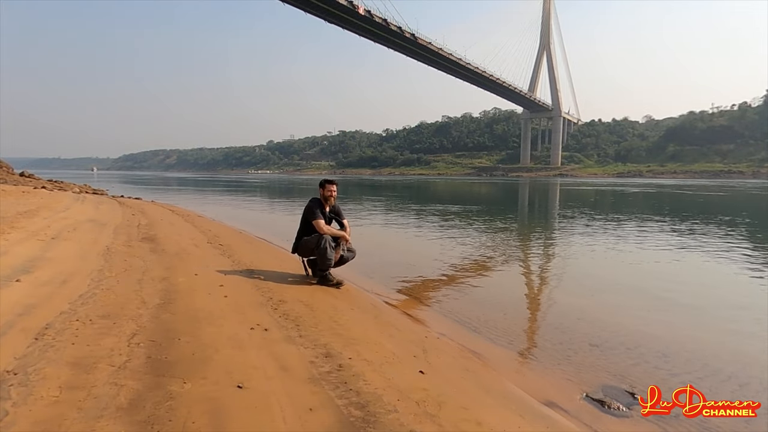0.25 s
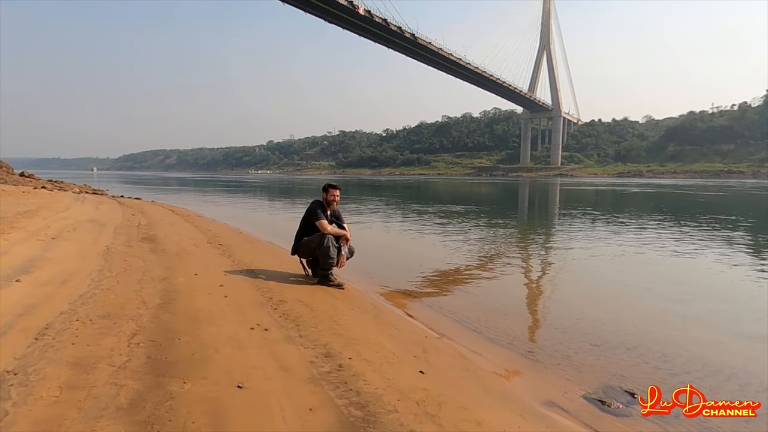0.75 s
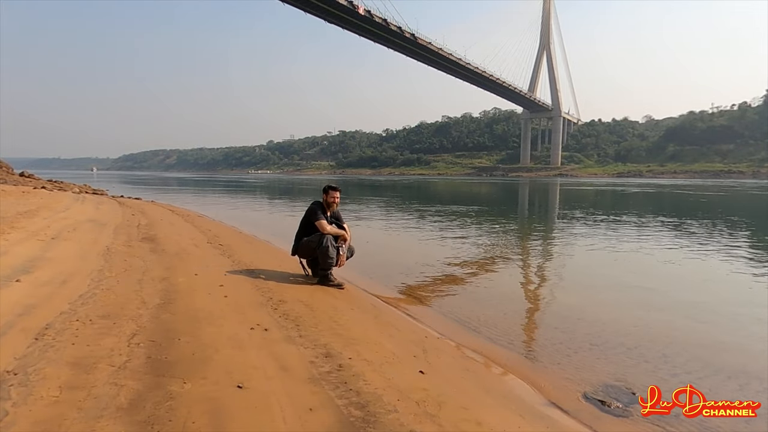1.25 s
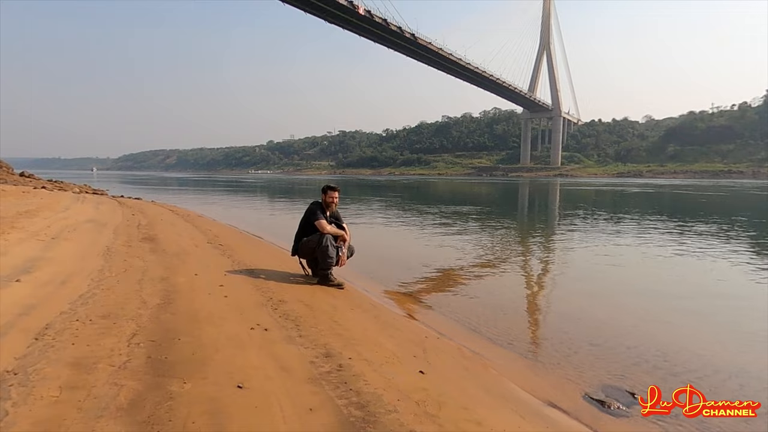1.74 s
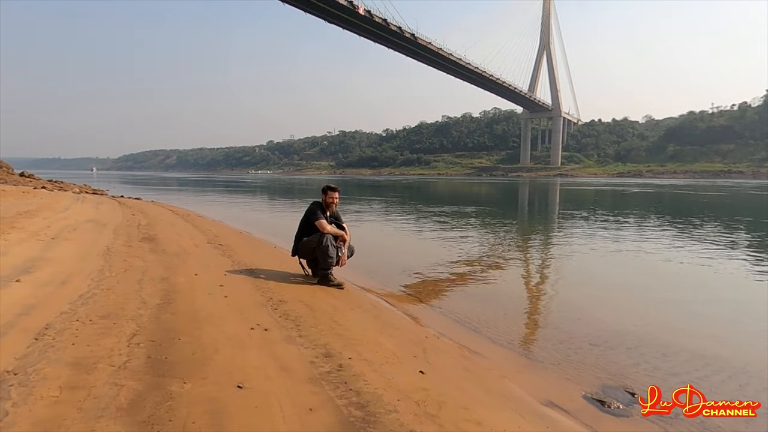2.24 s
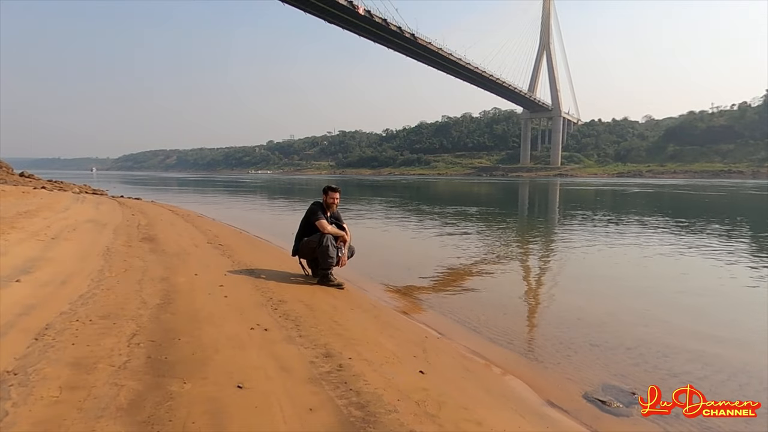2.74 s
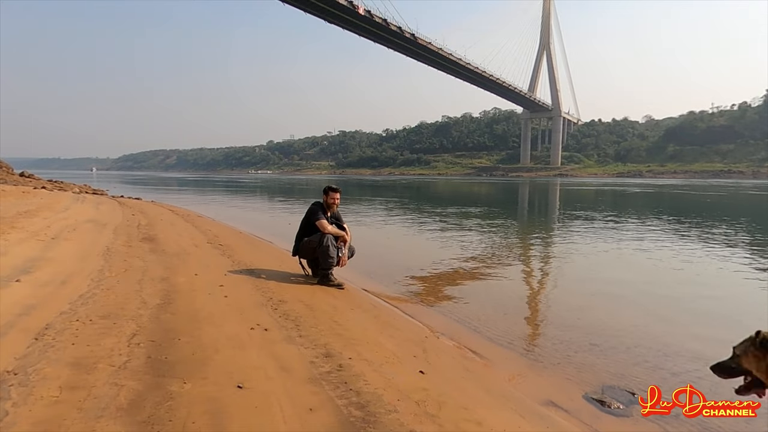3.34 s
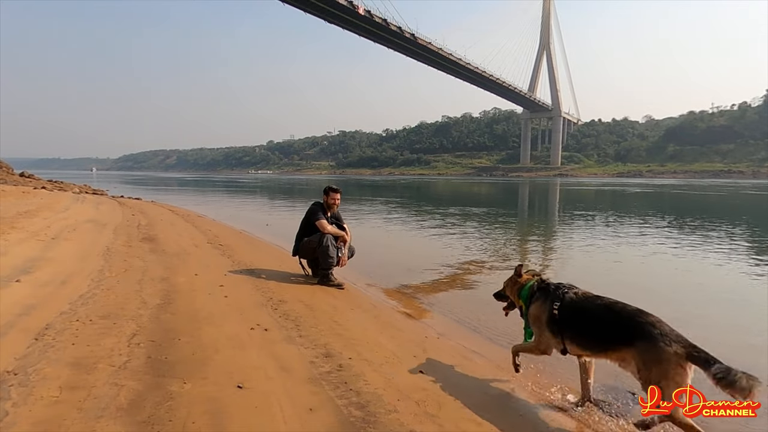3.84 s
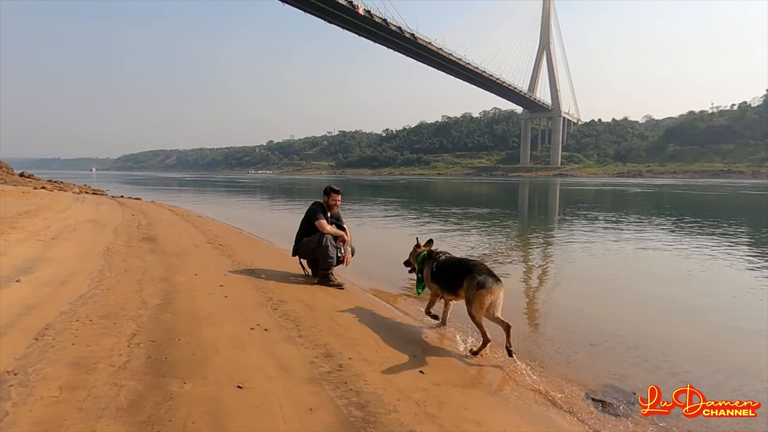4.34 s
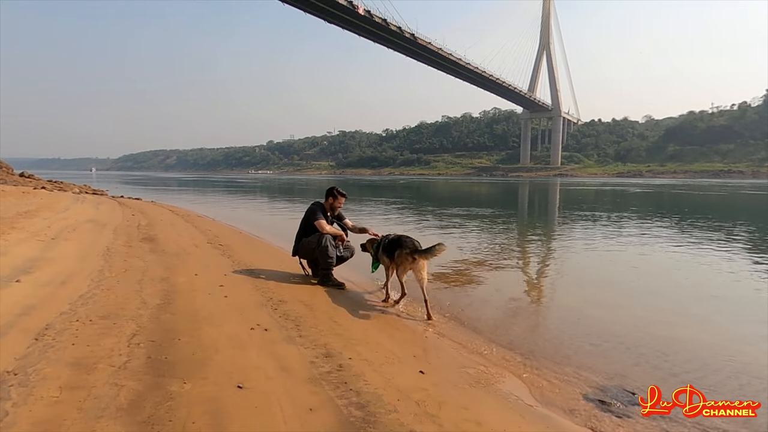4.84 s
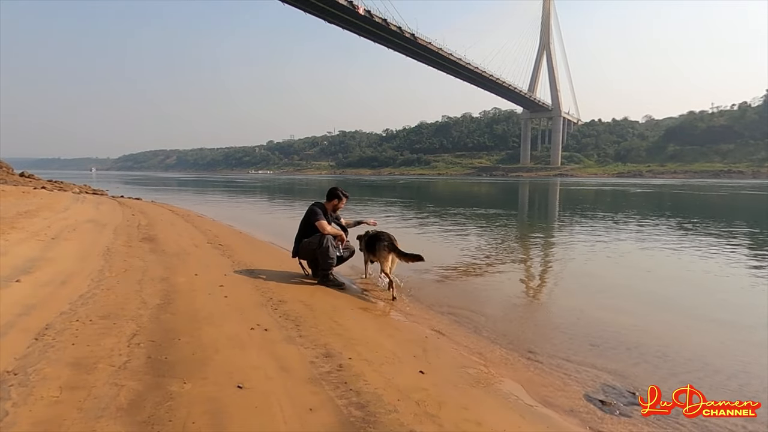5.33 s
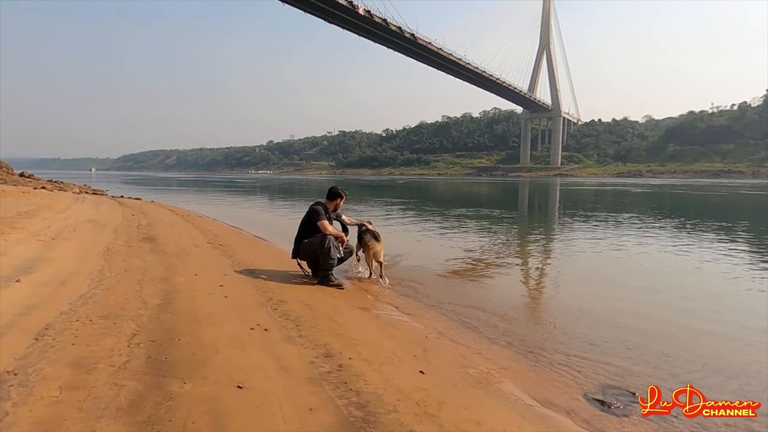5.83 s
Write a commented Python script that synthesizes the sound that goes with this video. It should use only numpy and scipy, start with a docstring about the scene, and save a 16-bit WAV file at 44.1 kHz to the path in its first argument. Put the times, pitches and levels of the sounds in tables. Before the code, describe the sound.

A dog trots through river shallows from the right to ahead, paws splashing, plopping and slapping over a faint distant engine drone and low rumble.

```python
"""A dog trots through the shallows along a sandy river shore, coming in from the right and moving ahead.
Its paws slap the water and trap air pockets: gliding sines with bubble clouds, noise froth and gulps,
short knocks and snaps. Its strokes stir sloshing, pattering water made of clicks, noise and tiny bubbles.
Far off a slow diesel engine, probably a boat's, drones as a stack of wandering sines over a distant noise
rumble, and a light breeze adds low flutter."""
import sys
import numpy as np
from scipy import signal
from scipy.fft import rfft, irfft, next_fast_len
from scipy.io import wavfile
from scipy.ndimage import uniform_filter1d

SR = 44100
rng = np.random.default_rng(int(sys.argv[2]) if len(sys.argv) > 2 else 0)


def store_pcm(level_fs):
    """Save levels as 16-bit WAV."""
    pcm = np.round(np.clip(level_fs, -1, 1) * 32767).astype(np.int16)
    wavfile.write(sys.argv[1], SR, np.atleast_2d(pcm).T)


N = 268128
TIME = np.arange(N) / SR

# paws plunge: (time [s], level [dB], nominal pitch of the air pocket [Hz], nominal decay of its cloud [s])
PAW_PLUNGES = [(0.07, -29, 846, 0.01), (0.127, -27, 1660, 0.026), (0.462, -24.5, 510, 0.027),
               (0.509, -24, 700, 0.023), (0.698, -31.5, 616, 0.01), (0.826, -21.5, 447, 0.017),
               (0.831, -24, 1300, 0.0061), (0.856, -27, 415, 0.022), (0.878, -21.5, 675, 0.021),
               (1.194, -24, 684, 0.017), (1.222, -20.5, 990, 0.012), (1.238, -22.5, 530, 0.014),
               (1.264, -24, 584, 0.0081), (1.29, -31, 1050, 0.0093), (1.445, -34, 535, 0.02),
               (1.633, -23, 485, 0.034), (1.905, -28, 835, 0.014), (1.947, -23, 694, 0.013),
               (2.261, -23.5, 775, 0.013), (2.531, -21, 1220, 0.013), (2.578, -28, 860, 0.014),
               (2.598, -18.5, 830, 0.016), (2.624, -17.5, 1140, 0.014), (2.928, -21.5, 660, 0.03),
               (2.948, -18, 907, 0.0092), (3.117, -22, 720, 0.02), (3.147, -17.5, 1510, 0.019),
               (3.438, -16, 1910, 0.013), (3.449, -21.5, 870, .014), (3.711, -15.5, 3450, 0.0066),
               (3.72, -27, 1870, 0.016), (3.732, -20.5, 2100, 0.015), (3.848, -20, 905, 0.0063),
               (3.895, -21, 1740, 0.013), (3.987, -18, 2230, 0.0072), (4.008, -20, 1700, 0.012),
               (4.017, -13.5, 1310, 0.018), (4.289, -21, 2120, 0.024), (4.31, -21.5, 1910, 0.022),
               (4.611, -22, 1700, 0.012), (4.624, -17, 1980, 0.011), (4.64, -17.5, 1170, 0.0095),
               (4.968, -27, 663, 0.0069), (5, -31, 1141, .014), (5.368, -22.5, 976, 0.017),
               (5.398, -27, 1020, 0.016), (5.422, -32, 1210, 0.0089), (5.696, -29, 1910, 0.012),
               (5.767, -25, 1060, 0.019), (5.814, -20.5, 790, 0.017), (5.84, -26, 1090, 0.0084),
               (5.921, -22, 1860, 0.0094), (6.035, -21.5, 1820, 0.019)]


def plunges():
    """A paw traps one big air pocket, which breaks into a cloud of bubbles: dense at once, then thinning and fading."""
    pocket_db, cloud_db, tail_db = 0.1, -6.0, -7.0  # the tail falls per cloud time
    cycles, rise, octaves, count = 13, 0.47, 0.417, 24
    out = np.zeros(N)
    for s, db, hz, cloud_s in PAW_PLUNGES:
        add(out, s, from_db(db + pocket_db) * bubble(hz * 0.948, cycles, rise))
        for turn, pitch, life in zip(rng.random(count), rng.standard_normal(count), rng.random(count)):
            late = 3.5 * turn ** 1.4  # in cloud times, crowded towards the start
            pitch = np.clip(pitch, -1.5, 2.5)
            gain_db = db + cloud_db + tail_db * late - 1.5 * abs(pitch)
            gain = from_db(gain_db) * rng.choice([-1, 1])
            small_bubble = bubble(hz * 2 ** (octaves * pitch), cycles * (.5 + life), rise)
            add(out, s + late * cloud_s, gain * small_bubble)
    return out


def froth():
    """Countless tiny pockets tear off each plunge: they gather as the paw enters, then trail off raggedly."""
    level_db, octaves_below, octaves_above = -16.5, 0.45, 0.71  # noise band around the big pocket's pitch
    attack_s, lasts = 0.0035, 0.95  # decay in cloud times
    lead_db, lead_s, ragged_db = -14, 0.046, 1.5
    out, age = np.zeros(N), np.arange(-SR // 20, SR // 6) / SR
    after = np.maximum(age, 0)
    entry = from_db(lead_db) * np.exp(-abs(age) / lead_s)
    tatters = from_db(ragged_db * drift(83))
    for s, db, hz, cloud_s in PAW_PLUNGES:
        band = [hz / 2 ** octaves_below, hz * 2 ** octaves_above]
        grains = rms_one(cut(rng.standard_normal(len(age)), band, "band"))
        tail = (1 - np.exp(-after / attack_s)) * np.exp(-after / (lasts * abs(cloud_s)))
        add(out, s + age[0], from_db(db + level_db) * grains * (tail + entry))
    return out * rms_one(tatters)


def gulps():
    """The hollow behind a deep plunge fills with a low lumpy gulp; small high pockets have hardly any."""
    level_db, low_hz, high_hz, deep_hz = -14.0, 300, 720, 650
    attack_s, lasts = 0.0029, 0.92  # decay in cloud times
    out, age = np.zeros(N), np.arange(SR // 6) / SR
    for s, db, hz, cloud_s in PAW_PLUNGES:
        depth = 1 / (1 + (hz / deep_hz) ** 4)
        body = rms_one(cut(rng.standard_normal(len(age)), [low_hz, high_hz], "band"))
        envelope = (1 - np.exp(-age / attack_s)) * np.exp(-(age / (lasts * cloud_s)) ** 2)
        add(out, s, depth * from_db(db + level_db) * body * envelope)
    return out


def pops():
    """Cavities under the paws clap shut with a short hollow knock."""
    # cavity closures: (time [s], level [dB], pitch [Hz], ringing [cycles])
    closures = [(0.5100, -27.5, 980, 1.2), (1.1953, -30, 740, 2), (1.2231, -27, 950, 1.4),
                (1.9475, -26.5, 1100, 1.3), (2.1602, -26, 1590, 1.4), (2.5319, -29, 1180, 1.6),
                (2.6202, -17, 960, 3.1), (2.624, -18, 1280, 2.2), (2.9485, -23.5, 964, 6),
                (3.4381, -21, 1910, 3.2), (3.722, -18.5, 1800, 2.6), (3.7316, -17.5, 2590, 8.1),
                (3.8478, -22, 1050, 1.8), (3.9932, -14, 3480, 2.7), (4.0087, -15.5, 1880, 1.8),
                (4.6152, -18.5, 1450, 2), (4.6363, -15, 1500, 3.7), (4.9670, -22, 835, 1.3),
                (5.3675, -26, 1000, 4.8), (5.4234, -24, 1480, 2.2), (5.7765, -34.5, 1360, 1.6)]
    out = np.zeros(N)
    for s, db, hz, cycles in closures:
        add(out, s, from_db(db) * pop(hz, cycles))
    return out


def slaps():
    """Water hit flat: one snap, then a brief faint spatter of decaying noise."""
    # sharp slaps: (time [s], level [dB], centre [Hz])
    flat_hits = [(0.0736, -27, 2330), (0.3997, -19.5, 4100), (0.7030, -35, 3200), (0.8345, -22.5, 2760),
                 (0.8682, -24, 5000), (1.8586, -23, 4650), (2.032, -21, 5370), (2.1287, -22, 5200),
                 (2.1352, -21, 5200), (2.1858, -32, 3640), (2.1924, -30, 4410), (2.2725, -10.5, 3520),
                 (2.3141, -29, 3970), (2.4989, -16, 3820), (2.535, -27, 2800), (2.6233, -30, 4500),
                 (3.0485, -18, 4420), (3.0976, -18, 4600), (3.1250, -19, 1970), (3.392, -14, 3900),
                 (3.3926, -19, 4100), (3.4688, -20, 4000), (3.479, -17, 4670), (3.6168, -19, 3320),
                 (3.7133, -18, 3160), (3.897, -20.5, 2040), (3.9065, -26, 2210), (3.9894, -19, 3000),
                 (4.0077, -16, 3000), (4.1083, -27, 3700), (4.2924, -23, 3040), (4.3119, -23, 2430),
                 (4.416, -26.5, 4800), (4.568, -25, 2970), (5.1935, -24, 5230), (5.2418, -24.5, 3620),
                 (5.2768, -26.5, 2600), (5.4162, -26, 1910), (5.4202, -23.5, 2350), (6.037, -22, 2500)]
    snap_cycles, spatter_db, spatter_band_hz, decay_s = 1.22, -15, [1900, 7500], 0.0024
    out, age = np.zeros(N), np.arange(SR // 20) / SR
    for s, db, hz in flat_hits:
        noise = rms_one(cut(rng.standard_normal(len(age)), spatter_band_hz, "band"))
        spatter = noise * np.exp(-age / decay_s)
        add(out, s, from_db(db) * pop(hz, snap_cycles))
        add(out, s, from_db(db + spatter_db) * spatter)
    return out


def pop(hz, cycles):
    """A cavity closes: it starts within a fraction of a cycle, rings briefly and is cut short; height 1."""
    turn = np.arange(int(3 * abs(cycles) / hz * SR) + 4) * hz / SR
    wave = np.sin(2 * np.pi * turn) * (1 - np.exp(-10 * turn)) * np.exp(-(turn / cycles) ** 3)
    return wave / np.abs(wave).max()


def bubble(hz, cycles, rise, swell_cycles=0.93):
    """A trapped bubble swells within a cycle or so, rings on, and climbs in pitch as it nears the surface."""
    age = np.linspace(0, 1, int(cycles / hz * SR) + 2)  # share of its life
    swell = 1 - np.exp(-cycles * age / swell_cycles)
    ring = np.sin(2 * np.pi * cycles * (age + rise * age ** 2 / 2))
    return swell * ring * np.exp(-np.log(1000) * age)  # the decay reaches -60 dB


def stirring():
    """Levels of gurgle, slosh and spray: strokes add power to churning water; the gurgle trails the slosh."""
    # a leg sweeps through the water:
    # (start [s], time to build [s], time at full strength [s], spray level [dB], slosh level [dB])
    strokes = [(0.064, 0.0061, 0.0077, -38, -55.5), (0.295, 0.025, 0.015, -38, -64),
               (0.385, 0.0087, 0.086, -45.5, -54), (0.635, 0.004, 0.0053, -42, -68),
               (0.679, 0.015, 0.049, -39.5, -54), (0.81, 0.0048, 0.05, -43, -51),
               (1.069, 0.0077, 0.11, -42.5, -55), (1.381, 0.014, 0.011, -40.5, -55),
               (1.445, 0.026, 0.082, -40, -52.5), (1.71, 0.13, 0.048, -37, -50.5),
               (1.91, 0.022, 0.031, -43, -59), (2.124, 0.0025, 0.006, -38, -53),
               (2.163, 0.018, 0.0074, -33, -43), (2.251, 0.008, 0.006, -33.5, -40.5),
               (2.441, 0.022, 0.07, -38.5, -51), (2.61, 0.0055, 0.012, -35.5, -57),
               (2.76, 0.034, 0.066, -36.5, -45), (3.0, 0.11, 0.025, -34, -43),
               (3.234, 0.056, 0.048, -43, -45), (3.374, 0.017, 0.03, -33, -40.5),
               (3.613, 0.026, 0.051, -40.5, -42.5), (3.698, 0.0044, 0.023, -37.5, -34),
               (3.877, 0.019, 0.025, -41, -43.5), (3.977, 0.0056, 0.011, -36.5, -33.5),
               (4.186, 0.036, 0.1, -42, -65), (4.558, 0.014, 0.049, -41.5, -46),
               (4.755, 0.097, 0.073, -42, -48.5), (4.929, 0.0048, 0.074, -51, -44),
               (5.168, 0.071, 0.037, -45, -46.5), (5.359, 0.0037, 0.051, -49.5, -53),
               (5.54, 0.025, 0.15, -48.5, -46), (5.806, 0.0044, 0.018, -42.5, -41.5),
               (5.89, 0.17, 0.029, -45.5, -56)]
    # spray of the water that churns on between strokes: (time [s], level [dB])
    churn = [(0.0, -55), (0.6, -49), (0.9, -49), (1.7, -46), (2.38, -55), (2.7, -44.5), (2.85, -44),
             (3.5, -44.5), (3.83, -52.5), (4.1, -51.5), (4.39, -63), (4.5, -48.5), (4.71, -65), (5.08, -58),
             (5.52, -54.5), (6.08, -52.5)]
    # slosh of middling bubbles between strokes: (time [s], level [dB])
    slosh_between = [(0.0, -63), (1.2, -55), (2.0, -58.5), (2.38, -61.5), (3.0, -49), (3.8, -50.5),
                     (4.5, -55.5), (5.1, -59.5), (5.4, -42.5), (5.53, -58), (5.7, -44), (6.08, -51)]
    # gurgle of large bubbles: (time [s], level [dB])
    gurgle = [(0.0, -62), (0.3, -53), (0.8, -50), (1.7, -43), (2.2, -46), (3.0, -43), (3.7, -47.5),
              (4.25, -50), (4.65, -54.5), (4.84, -44.5), (5.15, -53), (5.55, -51.5), (6.08, -44.5)]
    spray_fall, slosh_fall = 285, 269  # dB per s
    follows, lag_s = 0.52, 0.0086  # share of the slosh's swing that the gurgle takes, and how much later
    spray_power = from_db(in_time(churn)) ** 2
    slosh_power = from_db(in_time(slosh_between)) ** 2
    for start, build_s, hold_s, spray_db, slosh_db in strokes:
        spray_power += from_db(spray_db + stroke_db(start, build_s, hold_s, spray_fall)) ** 2
        slosh_power += from_db(slosh_db + stroke_db(start, build_s, hold_s, slosh_fall)) ** 2
    spray_db, slosh_db = 10 * np.log10([spray_power, slosh_power])
    swing_db = slosh_db - uniform_filter1d(slosh_db, size=SR)  # against its one-second average
    late_swing_db = np.interp(TIME - lag_s, TIME, swing_db)
    return in_time(gurgle) + follows * late_swing_db, slosh_db, spray_db


def stroke_db(start, build_s, hold_s, fall_db_per_s):
    """Level of one stroke below its top: it sets in, builds, holds and collapses."""
    build_db, onset_db_per_s = 13, 1518
    age, build_s = TIME - start, max(build_s, .002)
    below_db = build_db * np.clip(1 - age / build_s, 0, 1)
    below_db += onset_db_per_s * np.maximum(-age, 0)
    below_db += fall_db_per_s * np.maximum(age - build_s - hold_s, 0)
    return -np.minimum(below_db, 100)


def stirred_water(gurgle_db, slosh_db, spray_db):
    """Drops and tiny bubbles burst in clumps over a soft wash, third-octave by third-octave."""
    # colour of the stirred water: (frequency [Hz], level density [dB per Hz])
    colour = [(300, 2.5), (420, -10), (600, -6), (900, -6.5), (1300, -6), (2000, -2.5), (2800, -7.5),
              (3600, -5), (5500, -7), (7200, -14), (15000, -18)]
    # likeness of the two ears: (frequency [Hz], coherence [0 to 1])
    likeness = [(300, 0.99), (1500, 1), (5000, 0.94), (7000, 0.92), (9000, 0.2), (14000, 0.12)]
    drops_per_s, size_db, clump_db, wash = 800, 2.5, 3.0, .45  # drop rate is that at 3 kHz
    out, clumps = np.zeros((2, N)), clump_db * drift(46.0)
    edges = np.geomspace(290, 16000, 18)
    for low, high in zip(edges, edges[1:]):
        hz = np.sqrt(low * high)
        born = np.flatnonzero(rng.random(N) < drops_per_s * np.sqrt(hz / 3000) / SR)
        drop_db = size_db * np.minimum(rng.exponential(1, len(born)), 4)
        clicks = np.zeros(N)
        clicks[born] = from_db(drop_db) * rng.choice([-1, 1], len(born))
        patter = rms_one(clicks) + wash * rng.standard_normal(N)
        mid = rms_one(cut(patter, [low, high], "band"))
        side = rms_one(cut(rng.standard_normal(N), [low, high], "band")) * [[1], [-1]]
        # low bands follow the gurgle, middle bands the slosh, high bands the spray
        large, small = np.clip(.5 + np.log2([1200 / hz, hz / 3000]), 0, 1)
        level_db = large * gurgle_db + small * spray_db + (1 - large - small) * slosh_db
        gain = from_db(level_db + at_hz(colour, hz) + clumps) * np.sqrt((high - low) / 2000)
        alike = np.clip(at_hz(likeness, hz), 0, 1)
        out += gain * (np.sqrt(1 + alike) * mid + np.sqrt(1 - alike) * side)
    return out


def plinks(level_db, low_hz, high_hz, count, cycles, rise, spread_db):
    """Small ringing bubbles, as loud as the water is stirred; each glides upward by a chance amount."""
    out = np.zeros(N)
    for when, pitch, size, life, shallow in rng.random((count, 5)):
        gain = from_db(level_db[int(when * N)] + spread_db * (2 * size + 2.5))
        hz = low_hz * (high_hz / low_hz) ** pitch
        add(out, when * N / SR, gain * bubble(hz, cycles * (.5 + life), rise * shallow))
    return out


def plips():
    """Falling drops each leave one bubble that chirps upward."""
    # single clear bubbles: (time [s], level [dB], nominal pitch [Hz])
    clear_bubbles = [(1.023, -32.5, 1300), (1.418, -33, 3020), (1.717, -33, 3400), (2.162, -39, 1580),
                     (2.605, -20, 910), (3.036, -26.5, 710), (3.273, -28, 2400), (3.324, -23.5, 1080),
                     (3.553, -28, 1030), (3.762, -25, 2980), (3.804, -26, 1460), (4.063, -28.5, 2920),
                     (4.123, -34, 2700), (4.148, -33, 2020), (4.176, -31, 1590), (4.392, -35.5, 2280),
                     (4.451, -31.5, 1800), (4.505, -24.5, 2310), (4.64, -28, 2940), (4.804, -29, 2460),
                     (4.835, -33, 2600), (4.945, -31, 1400), (5.287, -31, 1430), (5.462, -31, 1900),
                     (5.506, -32, 1400), (5.68, -27.5, 1310), (5.698, -28, 2180), (5.722, -26, 824),
                     (5.727, -32, 1580), (5.926, -23, 1560), (5.944, -25, 1910), (6.014, -31, 2570)]
    ring_s, rise = 0.02, 0.53
    out = np.zeros(N)
    for s, db, hz in clear_bubbles:
        # the chirp starts a little below its nominal pitch
        add(out, s, from_db(db) * bubble(hz * .94, ring_s * hz, rise))
    return out


def microphone(water, pan_db):
    """The ports pass little above 8 kHz, coloured by direction, and shade the far ear by frequency."""
    # response to sound from the side: (frequency [Hz], level [dB])
    port_side = [(5000, -1), (7400, -5.5), (8200, -11), (10000, -14), (12500, -21.5), (15000, -31)]
    # response to sound from half-way to the side: (frequency [Hz], level [dB])
    port_oblique = [(2700, -1), (3600, 4), (4600, -1), (6000, -3), (7500, 2), (8300, -7.5), (10000, -16),
                    (12500, -20.5), (15000, -25)]
    # response to sound from ahead: (frequency [Hz], level [dB])
    port_ahead = [(5000, -1), (7600, 0), (8300, -9.5), (9200, -20), (10500, -27), (13000, -17),
                  (15000, -27)]
    # how far each pitch follows the dog to the side: (frequency [Hz], share of its left-right difference)
    shade = [(600, 0.023), (900, 0), (1200, 0.28), (1800, 0.54), (4000, 0.33), (7000, 0.17), (10000, 0.35),
             (14000, 0.058)]
    directions_db = [-23, -2.5, 0]  # left minus right at the side, half-way and ahead
    heard = 0
    for share, port in zip(np.eye(3), (port_side, port_oblique, port_ahead)):
        coloured = tint(water, lambda hz: from_db(at_hz(port, hz)))
        heard = heard + np.interp(pan_db, directions_db, share) * coloured  # crossfade by direction
    shaded = tint(heard.mean(axis=0), lambda hz: at_hz(shade, hz))
    balance = np.tanh(pan_db * np.log(10) / 40)  # dB to (left - right) / (left + right)
    return heard + shaded * balance * [[1], [-1]]


def engine():
    """Lines of a slow diesel; the long path over the water makes each one fade and wander."""
    # engine lines: (multiple of the cycle rate, relative level [dB])
    lines = [(6, -13), (8, -16), (12, -3), (14, -12), (15, -4.5), (18, -2), (19, -6.5), (20, -9),
             (23, -3.5), (24, -6), (25, -2.5), (30, -4.5), (31, -8), (33, -6), (35, -8), (36, -16),
             (39, -11), (45, -16.5), (47, -17), (69, -24)]
    cycle_hz, level_db, waver_db, wander = 6.31, -43, 2.5, 0.67  # wander in radians at the 20th multiple
    out = np.zeros(N)
    for multiple, db in lines:
        phase = 2 * np.pi * (multiple * cycle_hz * TIME + rng.random())
        phase += wander * multiple / 20 * drift(0.52)
        out += from_db(level_db + db + waver_db * drift(2.45)) * np.sqrt(2) * np.sin(phase)
    return out


def rumble():
    """Distant roar of coloured noise that swells a little, nearly the same in both ears in the bass."""
    # distant rumble and open air: (frequency [Hz], relative level density [dB per Hz])
    colour = [(22, 2), (35, -9), (55, 2), (90, 4), (150, 5), (220, 3), (280, -4), (400, -12.5),
              (600, -20.5), (1000, -31.5), (2500, -37.5), (7000, -48), (9500, -54), (14000, -77)]
    # its width: (frequency [Hz], side minus mid [dB])
    width = [(40, -28), (125, -55), (260, -38), (500, -23), (1500, 1.5), (6000, -5.5)]
    level_db, swell_db = -37.5, 1.78
    mid = cut(tint(rng.standard_normal(N), lambda hz: from_db(at_hz(colour, hz))), 29, "high")
    side = cut(tint(rng.standard_normal(N), lambda hz: from_db(at_hz(colour, hz))), 22, "high")
    side = tint(rms_one(side), lambda hz: from_db(at_hz(width, hz)))
    return from_db(level_db + swell_db * drift(5.0)) * (rms_one(mid) + side * [[1], [-1]])


def breeze():
    """Light air brushes each port on its own: independent low noise under a shared slow gust."""
    level_db, gust_db = -62, 2
    flutter = cut(cut(rng.standard_normal((2, N)), [20, 70], "band", order=1), 300, "low")
    return from_db(level_db + gust_db * drift(5.0)) * rms_one(flutter)


def from_db(db):
    """Decibels to gain."""
    return 10 ** (np.asarray(db) / 20)


def rms_one(x):
    """Scale to unit power."""
    return x / np.sqrt(np.mean(x ** 2) + 1e-20)


def in_time(rows):
    """A curve of (time, value) read at every sample."""
    s, values = np.transpose(rows)
    return np.interp(TIME, s, values)


def at_hz(points, hz):
    """Read a spectrum on a log-frequency axis."""
    point_hz, values = np.transpose(points)
    return np.interp(np.log(hz), np.log(point_hz), values)


def drift(rate_hz):
    """Slow chance with spread 1: noise through two equal poles, computed every 40 samples."""
    pole = np.exp(-80 * np.pi * rate_hz / SR)
    noise = rng.standard_normal(N // 40 + 2002)
    slow = signal.lfilter([1], [1, -2 * pole, pole * pole], noise)[2000:]  # without the filter's start
    return np.interp(np.arange(N) / 40, np.arange(len(slow)), rms_one(slow))


def cut(x, hz, kind, order=2):
    """Butterworth filter."""
    sos = signal.butter(order, np.clip(hz, 10, .45 * SR), kind, fs=SR, output="sos")
    return signal.sosfilt(sos, x + 1e-18)


def tint(x, gain_at):
    """Weight a sound by a gain at each frequency."""
    size = next_fast_len(N + SR // 10)
    hz = np.maximum(np.fft.rfftfreq(size, 1 / SR), 1)
    return irfft(rfft(x, size) * gain_at(hz), size)[..., :N]


def add(out, s, sound):
    """Mix a short sound in at a time."""
    start = int(np.clip(s * SR, 0, N - 1))
    out[start:start + len(sound)] += sound[:N - start]


def scene():
    """Water at the dog's place, in front of the far drone."""
    # where the dog is: (time [s], left minus right in the treble [dB])
    place = [(0.0, -30.5), (2.52, -21), (3.45, -9.5), (3.94, -3), (4.64, 1.7), (6.08, 1)]
    gurgle_db, slosh_db, spray_db = stirring()
    water = plunges() + froth() + gulps() + pops() + slaps() + plips()
    water = water + stirred_water(gurgle_db - 0.5, slosh_db + 0.3, spray_db - 2.5)
    # many bubbles of each size ring and run together into a trickle
    water += plinks(gurgle_db - 0.5, 308, 1020, count=300, cycles=13, rise=0.45, spread_db=3.0)
    water += plinks(slosh_db + 0.5, 1136, 2740, count=1000, cycles=25.1, rise=0.41, spread_db=3.0)
    water += plinks(spray_db - 3.0, 2946, 7410, count=2000, cycles=31.8, rise=0.12, spread_db=2.5)
    # larger drops tick on the surface
    water += plinks(spray_db + 10.5, 2500, 6000, count=520, cycles=4.1, rise=0.05, spread_db=1.5)
    return microphone(water, in_time(place)) + engine() + rumble() + breeze()


def record(dry):
    """A steep low-pass cuts the top: 60 dB down from 15.8 kHz upward."""
    return signal.sosfilt(signal.cheby2(14, 60, 15800, fs=SR, output="sos"), dry)


dry = scene()
out = record(dry)
store_pcm(out)
```